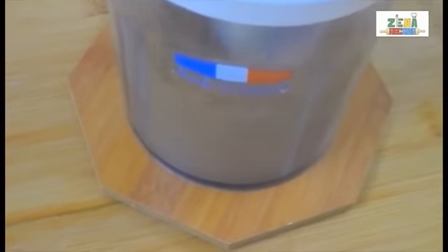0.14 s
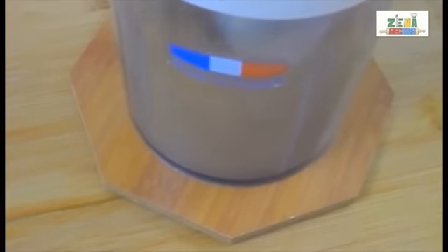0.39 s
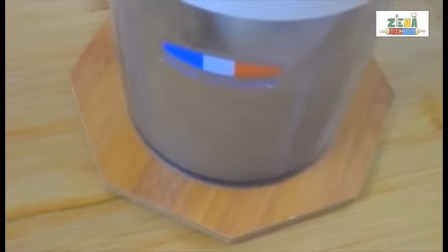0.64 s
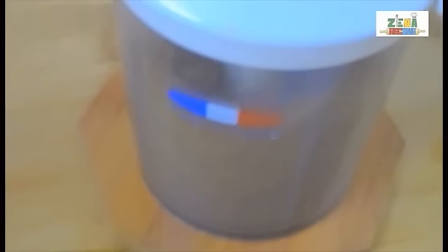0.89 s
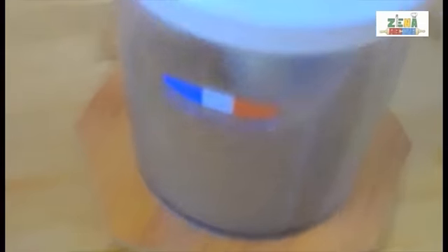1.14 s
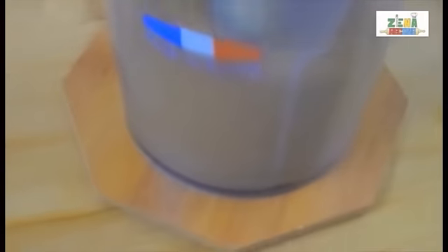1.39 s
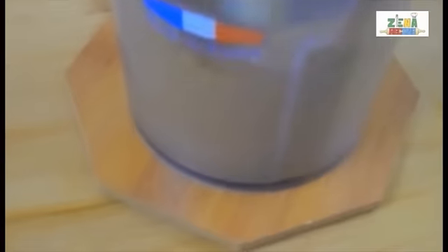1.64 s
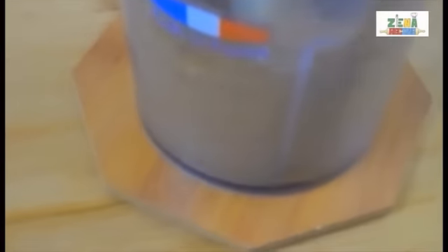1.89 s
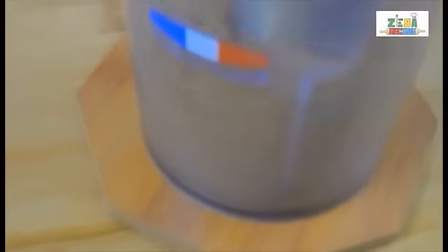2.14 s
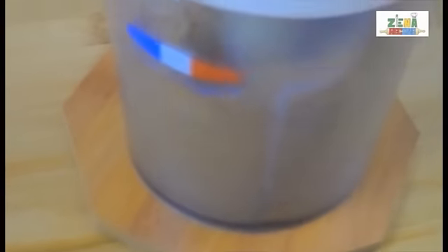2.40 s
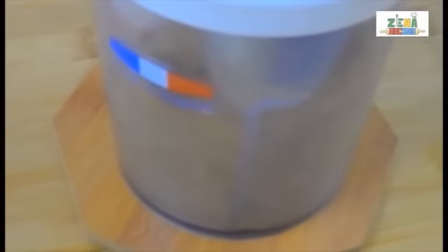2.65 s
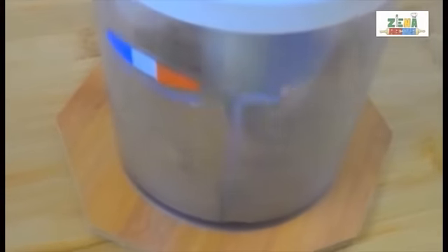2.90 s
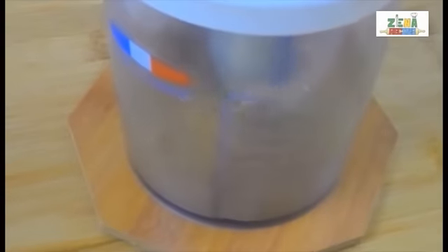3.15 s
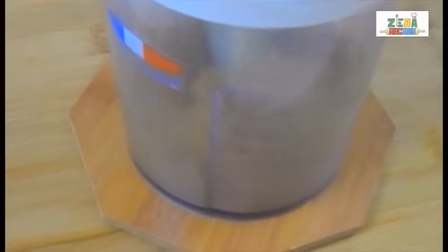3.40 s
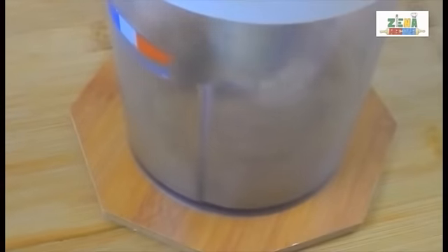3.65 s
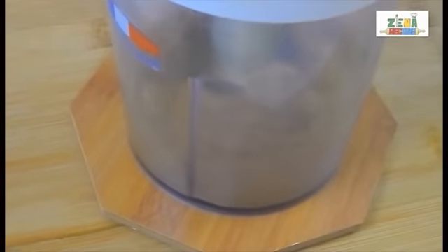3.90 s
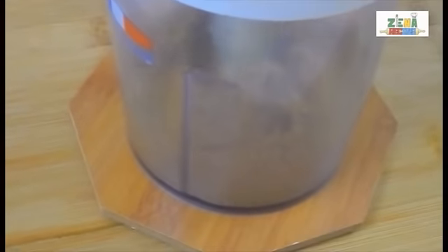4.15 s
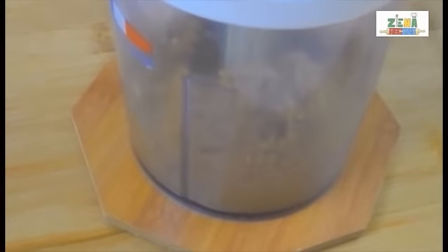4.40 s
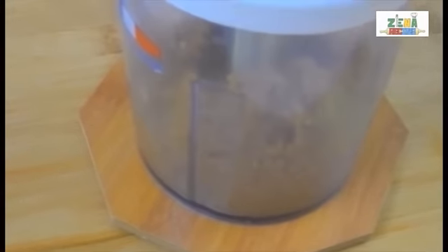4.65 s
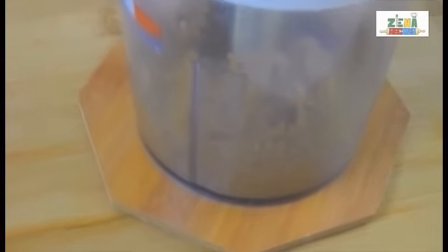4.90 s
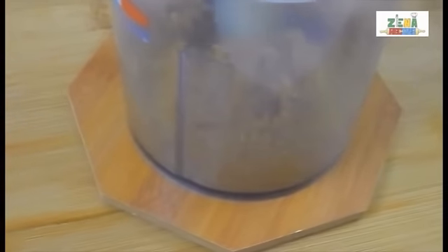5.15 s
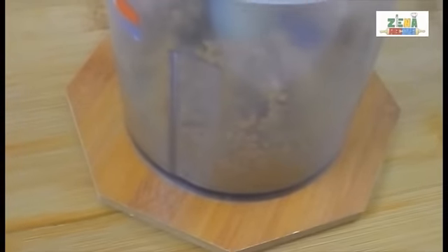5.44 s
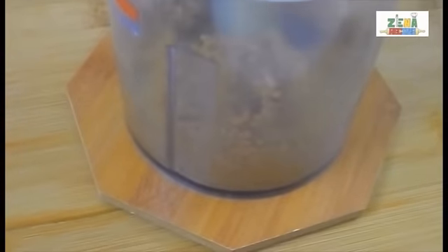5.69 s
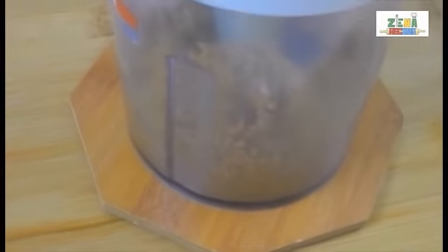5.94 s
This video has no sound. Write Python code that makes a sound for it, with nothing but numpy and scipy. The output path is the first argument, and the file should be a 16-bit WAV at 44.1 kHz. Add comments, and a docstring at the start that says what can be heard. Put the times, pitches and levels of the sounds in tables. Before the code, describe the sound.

A mini chopper motor is already running at full strength, nasal and buzzing, with nut meal hissing and rasping through its plastic casing. The pitch rises slightly, then droops. The button is released and the motor quickly winds down, leaving a short near-silence with faint hum and small ticks. A harder click restarts it, lower and weaker, slowly speeding up. Close microphone, small kitchen with slight reflections.

```python
"""Small electric nut chopper

It grinds nuts in a plastic bowl on a wooden board, stops, and starts again more slowly.
The gear teeth whine in sine harmonics that throb once per pinion turn; blade, nut meal and brushes
rasp as noise and repeating flaws through the casing, with a bright treble band that moves in pitch.
Ringing clicks make the button's ticks, heard in the pause over dull room noise and faint hum."""
import sys
import numpy as np
from scipy import signal
from scipy.fft import rfft, irfft, next_fast_len
from scipy.io import wavfile
from scipy.ndimage import uniform_filter1d

SR = 44100
rng = np.random.default_rng(int(sys.argv[2]) if len(sys.argv) > 2 else 0)


def elevation(decibels):
    """Turn decibel levels (scalar or array-like) into linear amplitude ratios."""
    levels = np.asarray(decibels, float)
    return 10 ** (levels / 20)


def put_to_file(sound):
    """Save the sound as 16-bit audio at rate SR, in the file named by the first command-line argument."""
    columns = np.atleast_2d(sound).T  # one column per channel
    safe = np.clip(columns, -1, 1)
    whole_steps = np.round(safe * 32767)
    wavfile.write(sys.argv[1], SR, whole_steps.astype(np.int16))


N = 266805
SECONDS = np.arange(N) / SR


def rms_one(x):
    """Scaled to rms 1."""
    return x / np.sqrt(np.mean(x ** 2) + 1e-20)


def in_time(tables):
    """Columns of tables that follow one another, interpolated at each sample."""
    s, *columns = np.transpose(np.concatenate(tables))
    return [np.interp(SECONDS, s, column) for column in columns]


def drift(rate_hz):
    """Slow random wander of rms 1: noise through two equal poles, made at SR / 40."""
    pole = np.exp(-2 * np.pi * rate_hz * 40 / SR)
    noise = rng.standard_normal(N // 40 + 2002)
    slow = signal.lfilter([1], [1, -2 * pole, pole ** 2], noise)[2000:]
    return np.interp(np.arange(N) / 40, np.arange(len(slow)), rms_one(slow))


def coloured(x, spectrum, peaks=()):
    """Filtered by a smooth spectrum with peaks and notches added in dB."""
    size = next_fast_len(N)
    hz = np.arange(size // 2 + 1) * SR / size + 1e-3
    point_hz, point_db = np.transpose(spectrum)
    db = np.interp(np.log(hz), np.log(point_hz), point_db)
    for centre_hz, width_hz, gain_db in peaks:
        db = db + gain_db / (1 + (2 * (hz - centre_hz) / width_hz) ** 2)
    return irfft(rfft(x, size) * elevation(db), size)[:N]


def band(x, low_hz, high_hz):
    """Band-pass."""
    return signal.sosfilt(signal.butter(2, [low_hz, high_hz], "band", fs=SR, output="sos"), x)


def ring(clicks, hz, t60_s):
    """A unit click sets a decaying sine of height 1 ringing."""
    radius = elevation(-60 / (t60_s * SR))
    angle = 2 * np.pi * hz / SR
    return signal.lfilter([0, np.sin(angle)], [1, -2 * radius * np.cos(angle), radius ** 2], clicks + 1e-18)


STOP_S, START_S = 4.22, 4.98   # button let go, then pressed again


def by_burst(values):
    """The first value up to the second press, the other after it."""
    return np.where(SECONDS < START_S, *values)


COAST_S, SPIN_UP_S = .12, .058   # time constants


def pace():
    """Share of full speed: coasting down after the stop, rising after the start."""
    coasting = np.exp(-np.maximum(SECONDS - STOP_S, 0) / COAST_S)
    rising = 1 - np.exp(-np.maximum(SECONDS - START_S, 0) / SPIN_UP_S)
    return by_burst([coasting, rising]) + 1e-3


GRIP_S, RISE_DB_PER_S = .032, 2500


def gate_db(hold_s, fall_db_per_s):
    """Holds, then falls after the stop; rises quickly after the start."""
    fall_db = -fall_db_per_s * np.maximum(SECONDS - STOP_S - hold_s, 0)
    rise_db = -RISE_DB_PER_S * np.maximum(START_S + GRIP_S - SECONDS, 0)
    return by_burst([fall_db, rise_db])


# Gear speed under power, one list per burst. Each row: time in seconds, tooth meetings per second.
POWERED_SPEED = [
    [(0, 683), (.11, 686), (.53, 678.5), (.68, 672), (.86, 672), (1.06, 684.5), (1.25, 685), (1.5, 709),
     (1.74, 715), (1.9, 704), (2.2, 690), (2.5, 670), (2.66, 654), (2.86, 627.5), (3.05, 624), (3.41, 640),
     (3.55, 635), (3.96, 606), (4.19, 622)],
    [(4.9, 465), (5.3, 466), (5.51, 477), (5.65, 475), (5.86, 496.5), (5.93, 509), (6.05, 514)],
]
# Tooth meetings per throb, one value per burst.
MEETINGS_PER_THROB = [7, 8]


def gear_phase():
    """Phase of tooth meetings and of pinion turn; the load makes the speed tremble, most while it glides."""
    tremble = 1 + (.0015 + .05 * np.minimum(1 - pace(), .4)) * drift(40)
    tooth_hz = in_time(POWERED_SPEED)[0] * pace() * tremble
    turn_hz = tooth_hz / by_burst(MEETINGS_PER_THROB)
    return 2 * np.pi * np.cumsum(tooth_hz) / SR, 2 * np.pi * np.cumsum(turn_hz) / SR


# Base level of the whine. Each row, one per burst: levels of harmonics 1 to 5 in dB.
WHINE_DB = [
    [-45, -37, -36, -50, -36],
    [-64, -39, -56, -46, -36],
]
# Change while the gears coast or speed up. Each row, one per burst: harmonics 1 to 5 in dB.
GLIDE_DB = [
    [-2, 1, -14, 0, 7],
    [13, 0, -4, -8, -4],
]
# How the casing passes a gear tone. Each row: frequency in Hz, gain in dB.
PASSAGE = [(600, -4), (640, 1), (715, -3), (900, 0), (1210, -1), (1275, 2), (1310, -1), (1345, -10),
           (1430, -9), (1600, -8), (1750, 0), (1840, 3), (1880, -1), (1915, 0), (1965, -9), (2040, -3),
           (2140, 0), (2400, 1), (2470, -3), (2560, 2), (2750, 4), (2850, -2), (3030, 1), (3190, -5),
           (3400, -3), (3550, 0)]
# Side tones of harmonics 1 to 5: dB relative to the harmonic, before lean and wavering.
SIDE_DB = [-15, -9, -14, -5, -4]
# Standing favour of the upper over the lower side tones of harmonics 1 to 5, in dB.
SIDE_UP_DB = [2, 3, 0, -2, 0]
# How far the side tones of harmonics 1 to 5 follow the lean, as a factor.
SIDE_LEAN = [1, 1.1, .6, .3, .7]
# Tooth rate above which the lean favours the upper side tones, in Hz, one value per burst.
EVEN_SIDES_HZ = [665, 500]
LEAN_DB_PER_HZ = .2
USUAL_RASP_DB, WHINE_FOLLOWS = -31, .5   # whine shares half of the rasp's swing about this level
WHINE_HOLD_S, WHINE_FALL_DB_PER_S = .07, 360


def whine(tooth, turn):
    """Harmonics waver in level and phase; the uneven pinion adds two side tones above and below each."""
    powered_hz = in_time(POWERED_SPEED)[0]
    lean_db = LEAN_DB_PER_HZ * (powered_hz - by_burst(EVEN_SIDES_HZ))
    gliding = np.clip((1 - pace()) / .15, 0, 1)
    shared_db = WHINE_FOLLOWS * (in_time(RASP)[0] - USUAL_RASP_DB)
    shared_db = shared_db + gate_db(WHINE_HOLD_S, WHINE_FALL_DB_PER_S)
    out = 0
    for k in range(len(SIDE_DB)):
        level_db = by_burst(np.transpose(WHINE_DB)[k]) + gliding * by_burst(np.transpose(GLIDE_DB)[k])
        level_db = level_db + np.interp((k + 1) * powered_hz * pace(), *np.transpose(PASSAGE))
        phase = (k + 1) * tooth + rng.uniform(0, 2 * np.pi) + .25 * drift(30)
        tone = elevation(.5 + 2 * drift(18)) * np.sin(phase)
        upper_lead_db = SIDE_LEAN[k] * lean_db + SIDE_UP_DB[k]
        for way in (-2, -1, 1, 2):   # offset in pinion turns
            side_db = SIDE_DB[k] + np.sign(way) * upper_lead_db / 2 - 11 * (abs(way) - 1)
            slip = rng.uniform(0, 2 * np.pi) + .4 * drift(8)
            tone = tone + elevation(side_db + 2.5 * drift(14)) * np.sin(phase + way * turn + slip)
        out = out + np.sqrt(2) * elevation(level_db + shared_db) * tone
    return out


def repeating(phase, count):
    """Surface flaws that pass again on every turn."""
    flaws = rng.standard_normal(count)
    return rms_one(np.interp(phase / (2 * np.pi) % 1 * count, np.arange(count), flaws, period=count))


# Weaker tones, as multiples of the tooth rate.
OVERTONES = [1 / 7, .325, .64, 3.35, 17 / 3, 6, 20 / 3, 7, 55 / 7, 8, 9, 28 / 3]
# Their relative levels in dB, in the same order.
OVERTONE_DB = [-4, -2, -9, -8, -12, -14, -10, -10, -8, -10, -10, -9]
# Gain of weak tones and flaws against the noise in dB, one value per burst.
FLAWS_DB = [-13, -18.5]


def grinding(tooth, turn):
    """Noise and grit beaten once a turn and once a tooth, with weak tones and repeating flaws."""
    grit = (rng.random(N) < 4000 / SR) * elevation(2.0 * np.minimum(rng.exponential(1, N), 5))
    grit = grit * rng.choice([-1, 1], N)
    noise = rng.standard_normal(N) + 0.39 * rms_one(grit)
    noise = noise * (1 + .22 * np.cos(turn + .8 * drift(8))) * (1 + .25 * np.cos(tooth))
    tones = 0
    for multiple, db in zip(OVERTONES, OVERTONE_DB):
        tones = tones + elevation(db + 3.04 * drift(12.6)) * np.sin(multiple * tooth + 0.72 * drift(23))
    flaws = repeating(turn, count=400) + 0.71 * repeating(tooth / 3, count=200)   # pinion and rotor
    return noise + (tones + 1.67 * flaws) * elevation(by_burst(FLAWS_DB))


# Bright treble band of the gear noise. Each row: time in seconds, centre in Hz, level in dB against the treble.
TREBLE_BAND = [(0, 7000, -4.5), (.9, 6860, -8), (1.15, 6880, -13), (1.2, 5740, -22), (1.35, 5640, -7.5),
               (2.4, 5515, -16.5), (2.75, 5950, -11.5), (4.25, 5940, 0.5), (5, 5550, -22),
               (6.05, 5710, -4.5)]


def treble_band():
    """Narrow noise about a centre that moves over time: a bright treble emphasis."""
    centre_hz, band_db = in_time([TREBLE_BAND])
    flutter = rms_one(band(rng.standard_normal(N), 9.8, 150))
    return elevation(band_db) * flutter * np.cos(2 * np.pi * np.cumsum(centre_hz) / SR)


# Rasp level, one list per burst. Each row: time in seconds, base level of the treble in dB.
RASP = [
    [(0.0, -36.5), (0.14, -31.5), (0.17, -34), (0.65, -29), (0.85, -32.5), (1.09, -29), (1.53, -32.5),
     (1.68, -30.5), (1.71, -33), (1.92, -29.5), (2.36, -33), (2.43, -28.5), (2.44, -33.5), (3.1, -29.5),
     (4.2, -32.5)],
    [(5.05, -46.5), (5.27, -40), (5.314, -40), (5.32, -41), (5.374, -38), (5.452, -38.5), (5.882, -33.5),
     (5.888, -34), (6.05, -33.5)],
]
# Colour of the fast burst. Each row: frequency in Hz, relative density in dB per Hz.
FAST_COLOUR = [(18, -69.5), (30, -22.5), (213, -13), (400, -18), (674, -12), (899, -9.5), (1230, -11),
               (1560, -8), (1820, -4), (2840, -8.5), (3500, -5.5), (6070, -1.5), (10800, -34),
               (15600, -37.5)]
# Colour of the slow burst. Each row: frequency in Hz, relative density in dB per Hz.
SLOW_COLOUR = [(18, -66), (30, -27), (270, -21.5), (561, -20.5), (947, -11.5), (1110, -15.5), (1520, -20.5),
               (1820, -12), (2130, -16.5), (2370, -11), (3150, -16.5), (5760, -9.5), (10800, -42.5),
               (15600, -45)]
# Casing and bowl resonances and notches. Each row: centre in Hz, width in Hz, gain against the colour in dB.
CASING = [(126, 56, 4), (287, 121, 9), (668, 138, 7), (930, 96, -2), (1256, 42, 6.5), (1830, 100, 6),
          (2179, 120, 5), (2358, 72, 7), (2470, 110, -7), (2610, 220, 7.5), (2900, 140, -5.5),
          (3300, 80, -3.5), (3385, 67, 6), (4090, 33, 3), (4360, 46, -3), (4400, 76, -2), (4800, 40, -13),
          (5550, 270, 3.5), (5650, 180, -7.5), (8280, 380, 5.5), (9350, 200, 4.5)]
# Middle of the rasp: gain in dB against its treble, one value per burst.
MIDDLE_DB = [0.53, 1.5]
# Bass of the rasp. Each row: time in seconds, gain in dB against its treble.
BASS = [(0, 0), (.8, 1), (1.3, -1), (1.6, -3), (4.2, -5.5), (5.1, 5), (6.05, -9.5)]
# Middle gained by slowing, in dB per dB of speed lost, one value per burst.
DULLING_MIDDLE = [2.03, 0.21]
# Bass gained by slowing, in dB per dB of speed lost, one value per burst.
DULLING_BASS = [2.6, 4.7]
RASP_HOLD_S, RASP_FALL_DB_PER_S = 0.055, 319
RATTLE = .25   # dB of unevenness per dB of speed lost: slow blades catch fitfully


def rasp(tooth, turn):
    """Grinding through the casing; three ranges waver apart, and slow blades sound duller."""
    source = grinding(tooth, turn)
    bursts = [coloured(source, colour, CASING) for colour in (FAST_COLOUR, SLOW_COLOUR)]
    body = by_burst([burst / np.std(band(burst, 4200, 9500)) for burst in bursts])
    slowed_db = np.clip(-20 * np.log10(pace()) - 3, 0, 9.0)   # speed lost beyond the first 3 dB
    middle_db = by_burst(MIDDLE_DB) + by_burst(DULLING_MIDDLE) * slowed_db
    bass_db = in_time([BASS])[0] + by_burst(DULLING_BASS) * slowed_db
    bass = coloured(body, [(350, 0), (700, -12), (1400, -40)])
    lower = coloured(body, [(3000, 0), (4500, -12), (7000, -40)])
    out = bass * elevation(bass_db + 1.6 * drift(32))
    out = out + (lower - bass) * elevation(middle_db + 0.19 * drift(29))
    out = out + (body - lower) * elevation(0.36 * drift(2.3))
    out = out + treble_band()
    level_db = in_time(RASP)[0] + gate_db(RASP_HOLD_S, RASP_FALL_DB_PER_S)
    return out * elevation(level_db + RATTLE * slowed_db * drift(45))


# Colour of the room noise. Each row: frequency in Hz, relative density in dB per Hz.
ROOM_COLOUR = [(20, -30), (60, -10), (200, 0), (500, -9), (750, -14), (1000, -26), (2000, -36), (3200, -50),
               (15500, -58)]
# Faint steady hum. Each row: frequency in Hz, rms level in dB.
ROOM_TONES = [(355.3, -94), (597.5, -77.5), (721.4, -95.5)]
ROOM_DB = -70


def room():
    """Dull, slightly wavering room noise with steady hum sines."""
    out = elevation(ROOM_DB + 1.3 * drift(13)) * rms_one(coloured(rng.standard_normal(N), ROOM_COLOUR))
    for hz, db in ROOM_TONES:
        out = out + np.sqrt(2) * elevation(db) * np.sin(2 * np.pi * hz * SECONDS)
    return out


# Button and lid ticks. Each row: time in seconds, nominal strength in dB.
TICKS = [(4.576, -57), (4.706, -59), (4.775, -66), (4.845, -72), (4.883, -49), (5.018, -33)]
# Modes of the button. Each row: frequency in Hz, relative level in dB, 60 dB decay time in seconds.
BUTTON = [(990, -5.5, 0.066), (1330, -10, 0.034), (1630, -9, 0.023), (1870, 9, 0.02), (2230, -2, 0.017),
          (2600, -15, 0.025), (3900, -22, 0.011), (7000, -5, 0.011)]
# Bowl jerks on the board at the start. Each row: time in seconds, strength in dB, frequency in Hz.
JOLT = [(4.991, -39, 270), (5.008, -40, 292)]


def ticks():
    """Ringing plastic, dull when soft, with a broad snap when hard, and a low jolt as the motor grips."""
    at = [round(s * SR) for s, db in TICKS]
    strength_db = np.array(TICKS)[:, 1]
    softness = np.clip((-48 - strength_db) / 12, 0, 1)
    out = np.zeros(N)
    for hz, level_db, t60_s in BUTTON:
        clicks = np.zeros(N)
        dull_db = 9 * softness * np.log2(hz / 1500)
        clicks[at] = elevation(strength_db + level_db - 8 - dull_db + rng.normal(0, 4, len(at)))
        contact = rng.standard_normal(300) * np.hanning(300) / 10   # lasts a few milliseconds
        out += ring(np.convolve(clicks, contact)[100:N + 100], hz, t60_s)
    snaps = np.zeros(N)
    snaps[at] = elevation(strength_db - 5 - 20 * softness)
    dying = signal.lfilter([1], [1, -elevation(-60 / (0.038 * SR))], snaps)
    out += band(dying * rng.standard_normal(N), 800, 5000)
    for s, db, hz in JOLT:
        jerk = np.zeros(N)
        jerk[round(s * SR)] = elevation(db)
        out += ring(jerk, hz, 0.051)
    return out


KITCHEN_T60_S, KITCHEN_DB = .25, -11


def kitchen(x):
    """Dense reflections dying away; they smear the glides."""
    s = np.arange(SR // 2) / SR
    tail = rng.standard_normal(len(s)) * elevation(-60 * s / KITCHEN_T60_S) * (s > .004)
    tail = rms_one(tail) / np.sqrt(len(s))   # unit energy
    wet = signal.fftconvolve(x, tail)[:N]
    return (x + elevation(KITCHEN_DB) * wet) / np.sqrt(1 + elevation(2 * KITCHEN_DB))


# Moments when the sound thins to its strongest partials. Each row: time in seconds, depth in dB.
THINNING = [(.139, 11), (.194, 50), (.266, 15), (.543, 20), (.843, 18), (1.503, 18), (1.546, 17),
            (1.622, 12), (1.697, 16), (1.779, 17), (1.827, 22), (2.055, 23), (2.328, 17), (2.498, 19),
            (3.138, 12), (3.21, 22), (3.907, 19), (4.0, 17), (5.214, 15), (5.269, 15), (5.37, 26),
            (5.898, 16), (6.015, 14)]
THIN_S, THIN_S_PER_DB = .007, .0007   # deeper ones last longer


def thinned(x):
    """For up to a few hundredths of a second weak partials and all above 7200 Hz sink."""
    hz, s, frames = signal.stft(x, SR, nperseg=1024, noverlap=896)
    power = np.abs(frames) ** 2
    weak = uniform_filter1d(power, size=3, axis=0) < 1.3 * uniform_filter1d(power, size=60, axis=0)
    weak = weak | (hz[:, None] > 7200)
    sink_db = 0
    for at_s, depth_db in THINNING:
        length_s = THIN_S + THIN_S_PER_DB * depth_db
        sink_db = sink_db + depth_db * np.clip(1.5 - 2 * np.abs(s - at_s) / length_s, 0, 1)
    return signal.istft(frames * elevation(-sink_db * weak), SR, nperseg=1024, noverlap=896)[1][:N]


def scene():
    """Whine and ticks with kitchen reflections, plus rasp and room."""
    tooth, turn = gear_phase()
    return (kitchen(whine(tooth, turn) + ticks()) + rasp(tooth, turn) + room())[None]


def band_limit(x):
    """A steep low-pass at the top of the band."""
    return signal.sosfilt(signal.butter(12, 15700, fs=SR, output="sos"), x)


def record(dry):
    """Deepest bass cut, peaks rounded, brief thinning."""
    bass_cut = signal.sosfilt(signal.butter(2, 45.0, "high", fs=SR, output="sos"), dry[0])
    rounded = .26 * np.tanh(bass_cut / 0.27)
    mix = thinned(rounded)[None]
    return band_limit(mix)


dry = scene()
out = record(dry)
put_to_file(out)
```